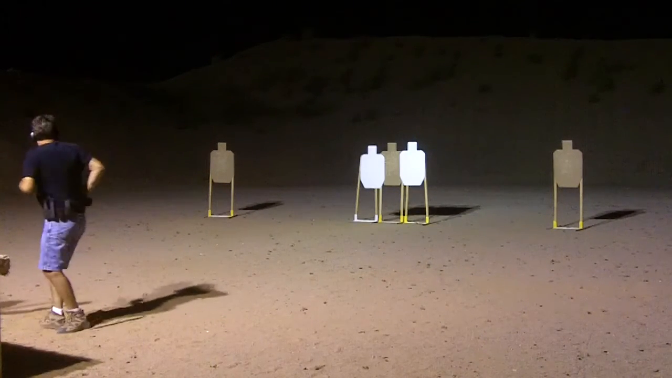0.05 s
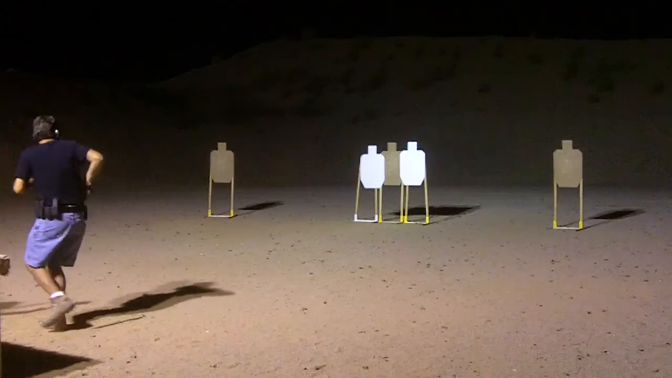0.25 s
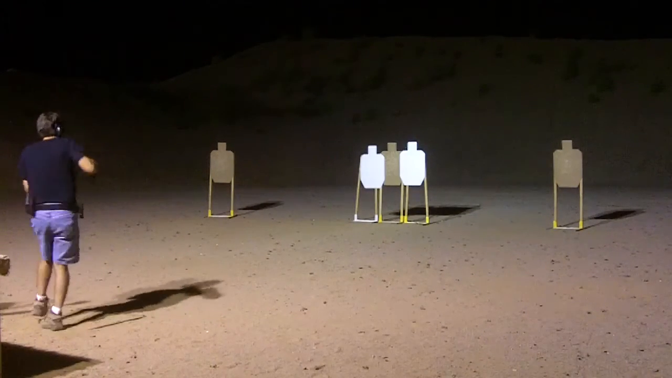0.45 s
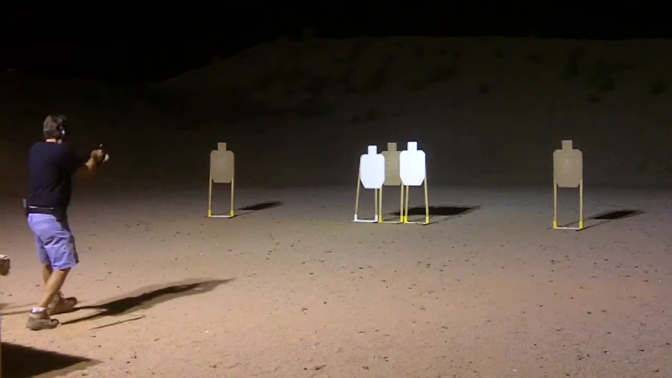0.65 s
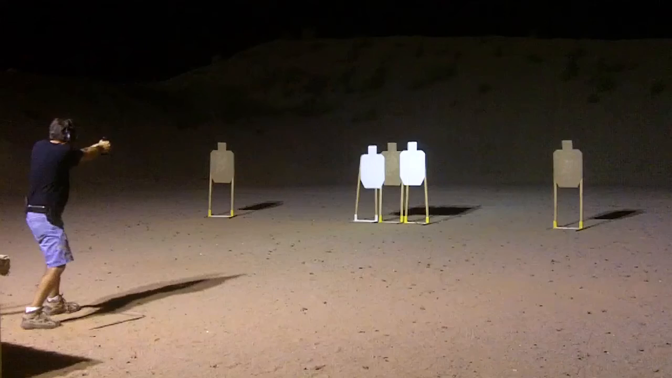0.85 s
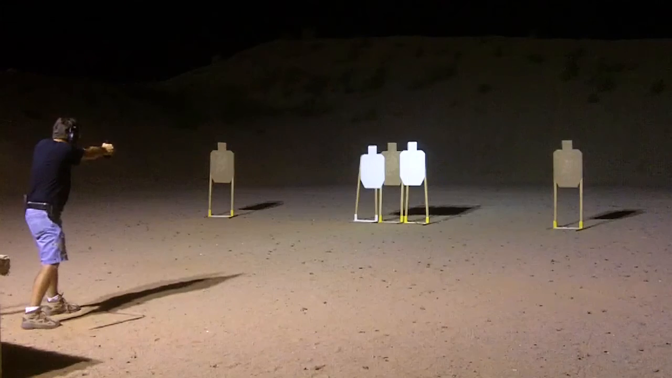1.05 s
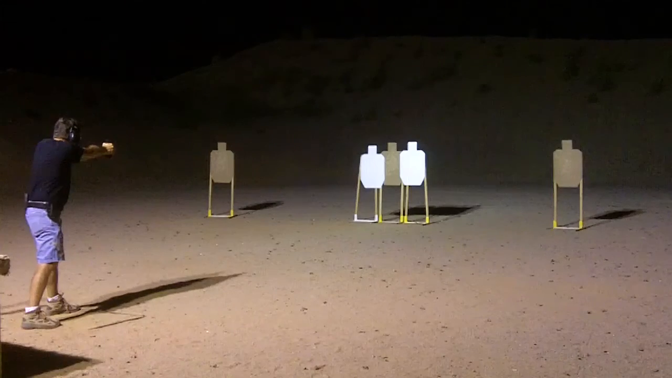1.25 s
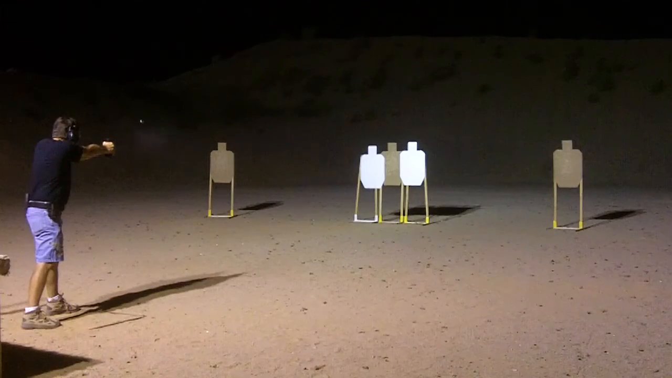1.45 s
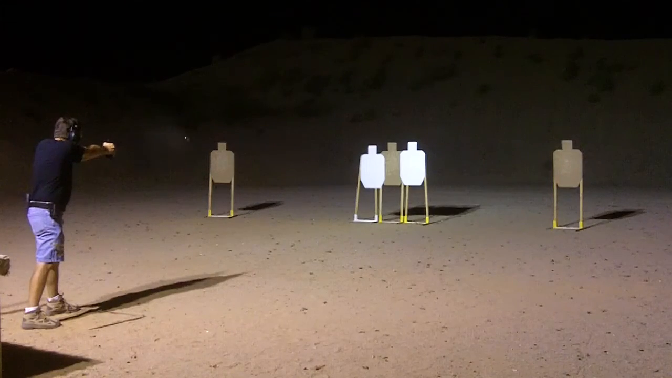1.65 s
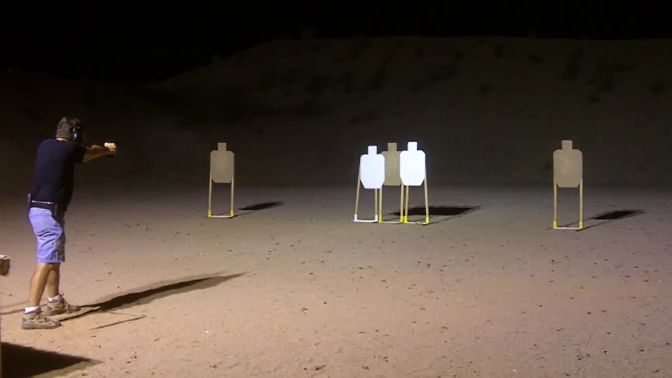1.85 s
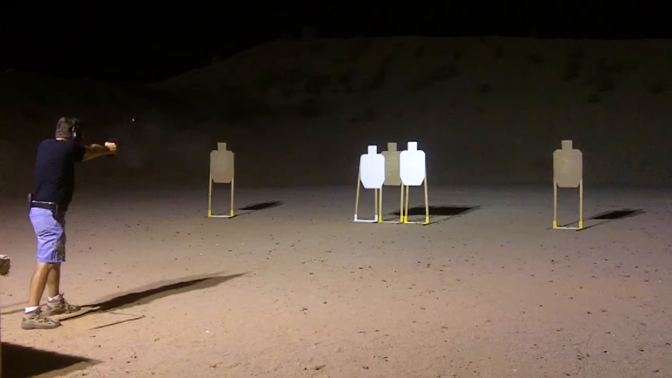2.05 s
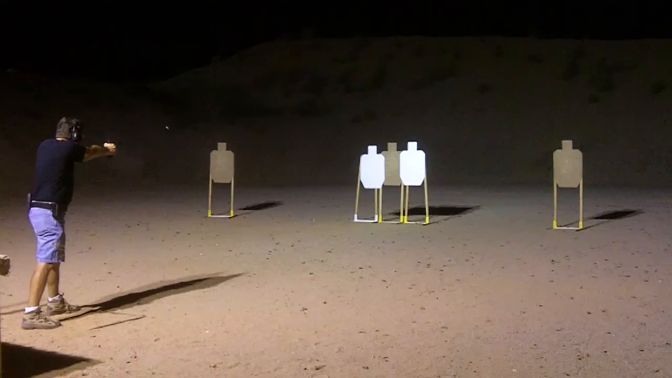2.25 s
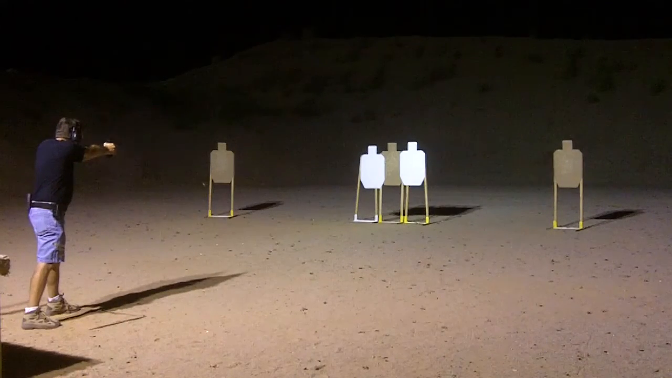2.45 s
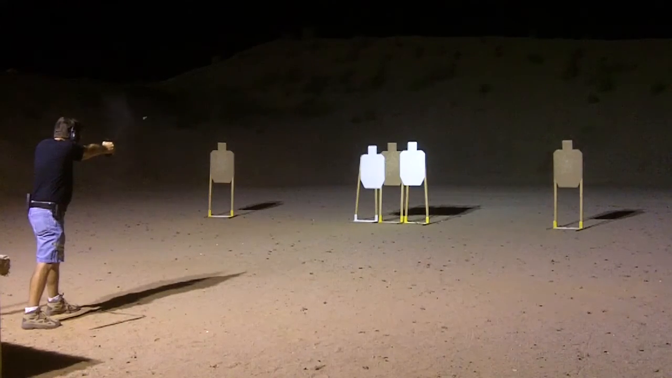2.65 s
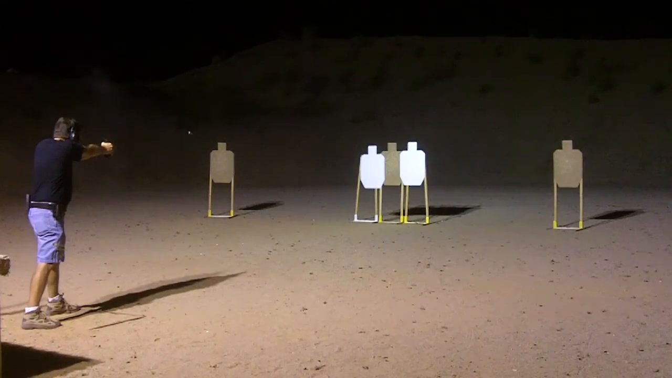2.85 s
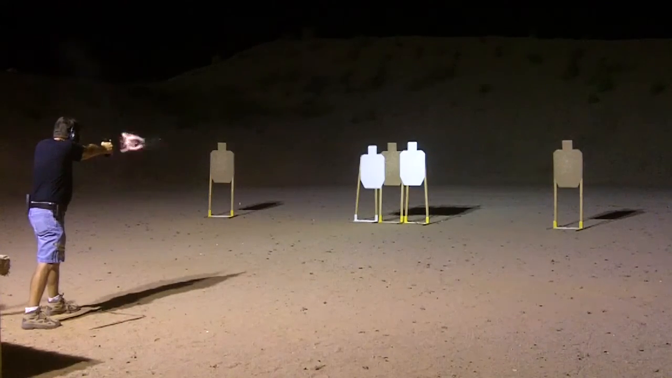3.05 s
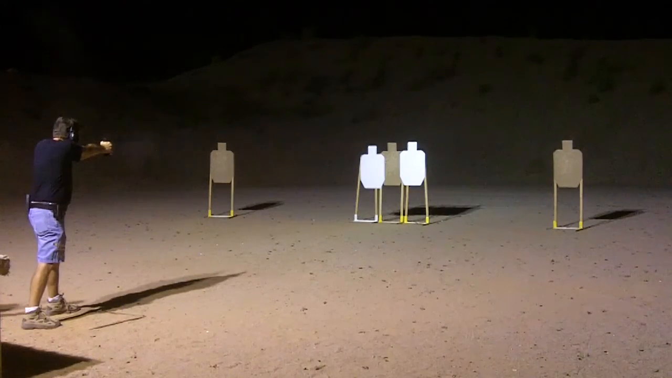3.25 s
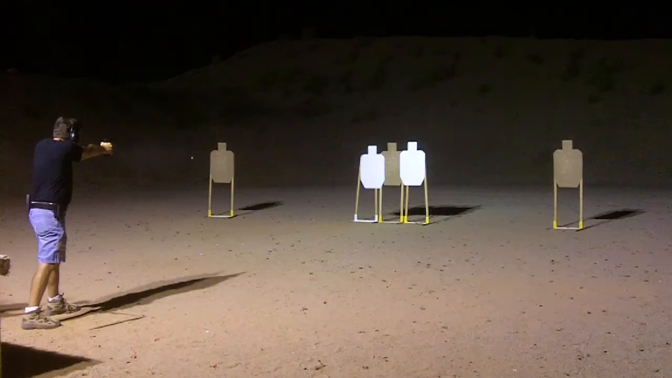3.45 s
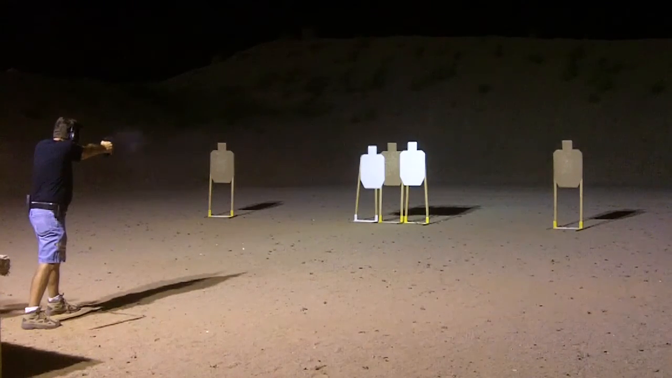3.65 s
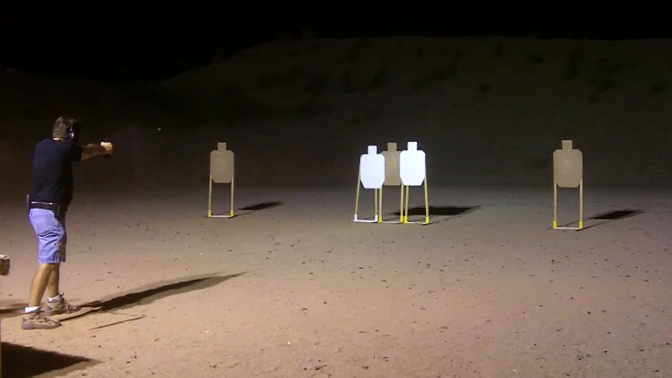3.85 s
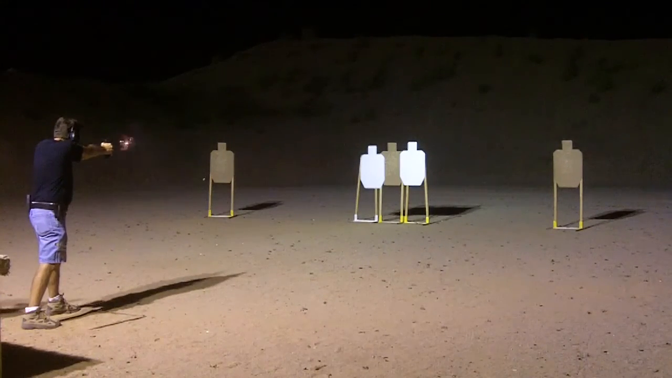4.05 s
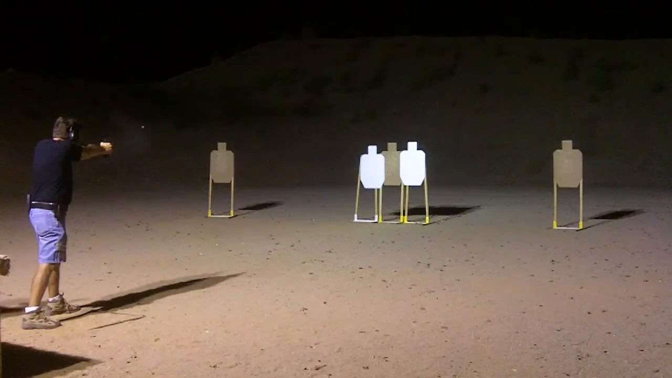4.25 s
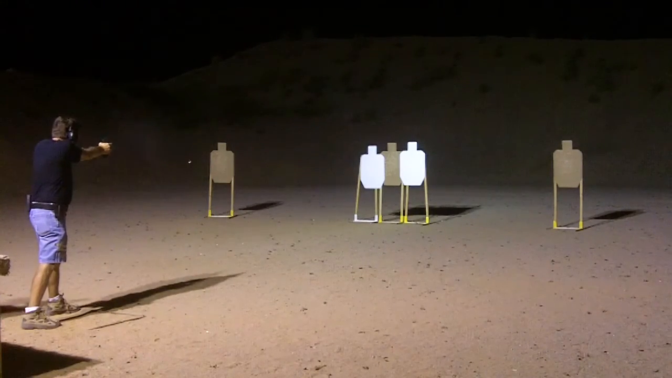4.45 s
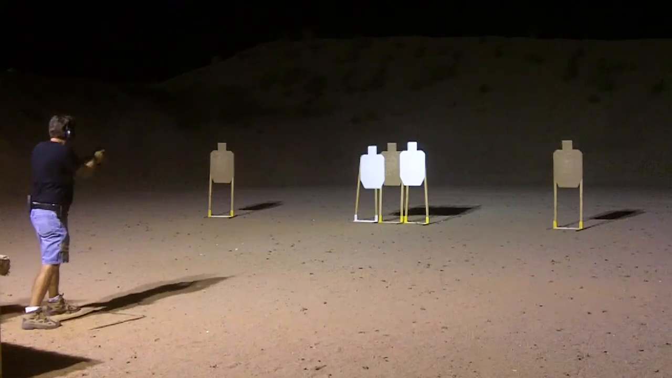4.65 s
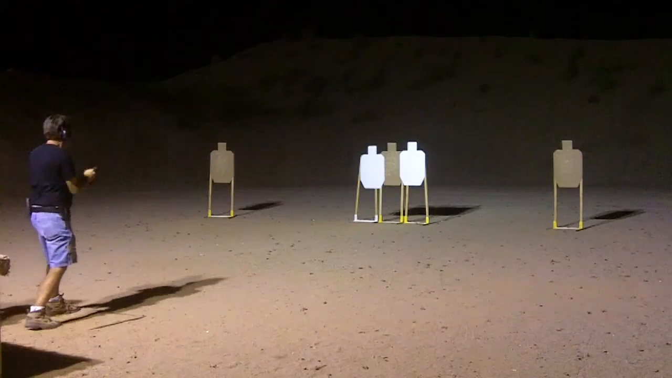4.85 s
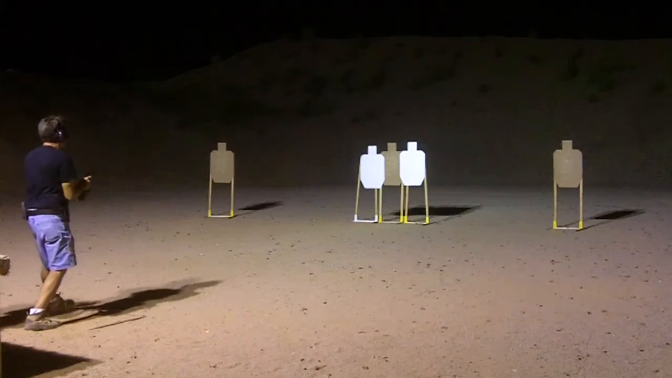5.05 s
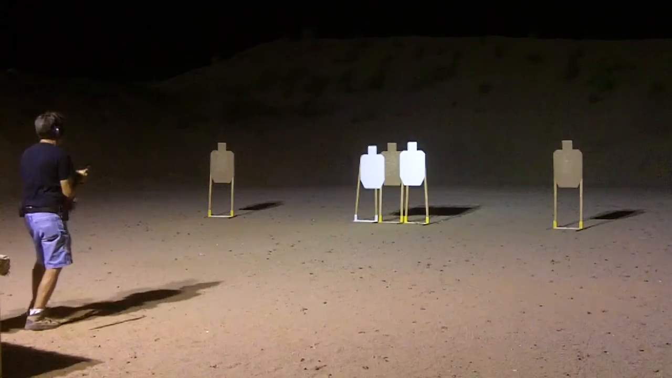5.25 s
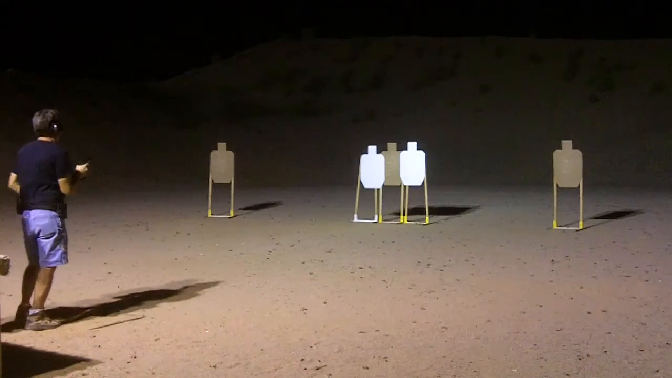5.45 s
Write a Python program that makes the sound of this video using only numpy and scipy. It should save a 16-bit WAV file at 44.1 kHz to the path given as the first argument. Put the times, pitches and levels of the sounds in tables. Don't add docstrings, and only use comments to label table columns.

```python
import sys
import numpy as np
from scipy import signal
from scipy.fft import rfft, irfft, next_fast_len
from scipy.io import wavfile
from scipy.ndimage import uniform_filter1d, map_coordinates

SR = 44100
rng = np.random.default_rng(int(sys.argv[2]) if len(sys.argv) > 2 else 0)


def digitize_waveform(pressure):
    field = np.atleast_2d(pressure).T
    bounded = np.clip(field, -1, 1)
    quanta = np.round(bounded * 32767).astype(np.int16)
    wavfile.write(sys.argv[1], SR, quanta)


def volts(x):
    e = np.asarray(x, float) / 20
    return 10 ** e


N = 242991

# (time [s], blast level [dB], offset left by the blast [full scale],
#         shelter echo level [dB], offset left by that echo [full scale])
SHOTS = [
    (1.3897, 0.5, .07, -3.5, .05),
    (2.0197, -2.5, .22, -4.5, 0.39),
    (2.5763, -2.5, 0.16, -5, -.05),
    (3.1582, -1.5, .21, -3, 0.11),
    (3.6931, -1.5, 0.23, -5, -0.17),
    (4.1653, -2, 0.14, -3.5, .2),
]
SHELTER_S = .0421
# (frequency [Hz], level [dB per Hz])
SLAP = [(260, -33), (450, -5.5), (2120, -0.5), (4630, -17.5), (5630, -26.5), (6840, -22), (8440, -33),
        (14500, -25.5), (15400, -32), (16400, -49)]
# (time [s], peak pressure, + push or - pull [full scale], frequency [Hz])
LUMPS = [(0.046, 0.36, 37), (0.101, 0.29, 61), (0.14, 0.23, 32), (0.181, -0.16, 37.3), (.35, 0.26, 36),
         (.388, 0.0067, 44), (0.403, 0.2, 35), (0.467, 0.33, 29.5), (.494, -.15, 47.4), (0.555, -0.18, 51),
         (0.598, -0.38, 61.6), (0.742, -0.46, 69), (.791, 0.084, 34), (.86, 0.35, 36.6),
         (0.876, -0.075, 37), (0.932, -0.05, 34), (0.985, 0.17, 54.5), (1.292, -0.12, 39.5),
         (1.315, 0.38, 42), (1.376, -0.18, 28.1), (1.923, -.09, 39.5), (4.754, -0.068, 36.1),
         (4.899, 0.058, 32.07), (5.006, -0.06, 46), (5.043, -0.22, 30), (5.125, 0.089, 35.4),
         (5.186, -0.029, 47.3), (5.221, .24, 45), (5.307, 0.054, 48.3), (5.39, -0.074, 46.6)]
# (time [s], peak pressure [full scale], frequency [Hz])
PUFFS = [(1.569, -0.067, 44), (1.67, 0.021, 60.5), (1.857, -0.042, 59.5), (2.011, -.06, 45),
         (2.229, 0.047, 60.3), (2.332, -0.011, 41.2), (2.448, 0.033, 55), (2.515, -0.038, 34.5),
         (2.899, 0.0091, 40), (3.992, 0.019, 71.4), (4.078, -0.016, 45), (4.468, -0.05, 65.5),
         (4.51, 0.026, 56), (4.617, -0.032, 45), (4.679, -0.052, 30)]


def unit(x):
    return x / np.sqrt(np.mean(x ** 2) + 1e-20)


def along(points, hz):
    f, v = np.transpose(points)
    return np.interp(np.log(hz + 1), np.log(f + 1), v)


def wobble(rate):
    knots = rng.standard_normal(int(N * rate / SR) + 4)
    return map_coordinates(knots, [np.arange(N) * rate / SR])


def coloured(x, spectrum):
    m = next_fast_len(len(x) + 8192)
    gain = volts(along(spectrum, np.fft.rfftfreq(m, 1 / SR)))
    return unit(irfft(rfft(x, m) * gain, m)[:len(x)])


def noise(spectrum):
    return coloured(rng.standard_normal(N), spectrum)


def add(track, s, x):
    part = track[round(s * SR):][:len(x)]
    part += x[:len(part)]


def swells(times, db, width):
    distance = (np.arange(N) / SR - times[:, None]) / width
    return np.sum(volts(db)[:, None] * np.exp(-distance ** 2), axis=0)


def wavelet(hz, cycles, phase):
    half = 2 * cycles / hz
    t = np.arange(-half, half, 1 / SR)
    return half, np.exp(-4 * (t * hz / cycles) ** 2) * np.cos(2 * np.pi * hz * t + phase)


def night_air():
    # (frequency [Hz], level [dB per Hz])
    night = [(120, -31.5), (200, -2.5), (579, -4), (723, -8), (815, -14), (1410, -15), (5360, -36),
             (6820, -44.5), (12000, -60.5), (15600, -89), (22000, -120)]
    return volts(-60.0 + 0.5 * wobble(6)) * noise(night)


def scuffs():
    # (start [s], length [s], level [dB])
    steps = [
        (0.024, .08, -72),
        (0.322, 0.058, -63.5),
        (0.541, 0.16, -68),
        (0.684, .08, -65.5),
        (.8, 0.073, -63.5),
        (1.213, 0.092, -70.5),
        (4.837, 0.19, -70.5),
        (5.028, 0.079, -63),
        (5.481, 0.051, -58.5),
    ]
    # (frequency [Hz], level [dB per Hz])
    grit = [(400, -20.5), (900, -1), (1500, 0), (2800, -5), (4500, -15.5), (6500, -19), (9000, -35.5),
            (15000, -51), (17000, -66)]
    rise, fall = 450, 440
    start, length, scuff_db = np.transpose(steps)[:, :, None]
    since = np.arange(N) / SR - start
    fade_db = np.minimum(0, np.minimum(rise * since, fall * (length - since)))
    level_db = np.max(scuff_db + fade_db, axis=0)
    grains = rng.standard_normal(N) * volts(4.5 * wobble(300) + 1.2 * wobble(35))
    shuffle = volts(-80)
    return (volts(level_db) + shuffle) * coloured(grains, grit)


def knocks():
    # (time [s], peak level [dB], frequency [Hz])
    raps = [(0.3162, -47.5, 1747), (0.3388, -43, 1710), (0.3496, -56, 1300), (0.3661, -50, 1260),
            (0.3696, -52, 1620), (0.3916, -41.5, 1750), (0.7309, -59, 1460), (0.7694, -57, 1536),
            (0.8105, -47, 1370), (0.8313, -56, 1400), (1.2355, -44, 1290), (1.2677, -45, 1330),
            (4.701, -49, 1960), (4.905, -63, 3830), (5.076, -50, 4250), (5.111, -55.5, 2660),
              (5.232, -62, 4100), (.338, -45, 2780), (.367, -43, 2750), (1.216, -57.5, 4400),
              (1.228, -54, 1470), (1.247, -50, 1480), (1.257, -50, 1370), (1.281, -41, 1440),
              (1.958, -62.5, 3700), (1.998, -45, 1490)]
    out = np.zeros(N)
    t = np.arange(SR // 30) / SR
    for s, db, hz in raps:
        low = np.sin(2 * np.pi * hz * t * (1 - 1.5 * t))
        high = .45 * np.sin(2 * np.pi * 1.6 * hz * t)
        add(out, s, volts(db - 2.5 - 60 * t / .016) * (low + high))
    return out


def buffeting(strength_db, surges):
    # (frequency [Hz], level [dB per Hz])
    buffet = [(3, -22), (12, 8), (40, -7), (65, -11), (110, -37.5), (200, -96.5)]
    uneven = volts(0.53 * wobble(38) + 1.8 * wobble(27))
    return (volts(strength_db + 7.5) + surges) * unit(uneven * noise(buffet))


def flutter(strength_db, surges):
    # (frequency [Hz], level [dB per Hz])
    flutter_colour = [(30, -42), (60, -2.5), (120, -6), (220, -19.5), (450, -49), (900, -78.5),
                      (2000, -110)]
    calm_db, growth, under_db = -31, 1.1, -14.5
    lump_s, peak, _ = np.transpose(LUMPS + PUFFS)
    steady = volts(calm_db + growth * (strength_db - calm_db) + under_db)
    stir = swells(lump_s, 20 * np.log10(np.abs(peak) + 1e-3) - 14, width=.02)
    uneven = volts(2.2 * wobble(30))
    return (steady + stir + .3 * surges) * unit(uneven * noise(flutter_colour))


def lumps():
    out = np.zeros(N)
    for s, size, hz in LUMPS + PUFFS:
        half, wave = wavelet(hz, 0.54, rng.normal(0, 0.59))
        add(out, s - half, size * wave)
    return out


def fizz(pressure):
    # (frequency [Hz], level [dB per Hz])
    tearing = [(1500, -20), (4000, -3.5), (9000, -3.5), (15500, -5.5), (17000, -40.5)]
    return volts(-62.5 + 6 * wobble(350) + 3 * wobble(18)) * pressure ** 2 * noise(tearing)


def thumps():
    # (time [s], peak level [dB], frequency [Hz])
    eddies = [(0.046, -39, 255), (0.095, -34, 236), (0.17, -40.5, 250), (0.28, -47, 216), (0.479, -42, 255),
              (0.512, -27.5, 245), (.531, -28, 393), (.588, -46, 255), (0.617, -33, 352),
              (.674, -47.5, 330), (0.736, -30.5, 237), (.787, -35, 245), (.8, -38.5, 301),
              (0.845, -37, 255), (0.859, -37, 258), (0.887, -43, 254), (.9, -41.5, 285), (1.29, -24.5, 233),
              (1.296, -43, 299), (1.307, -34.5, 246), (1.846, -44, 239), (3.993, -50.5, 245),
              (4.457, -50, 243), (4.613, -60, 240), (5.11, -40, 253), (5.202, -45, 240), (5.228, -23, 252),
              (5.244, -36, 255), (5.271, -35.5, 255), (5.338, -28.5, 258.6)]
    out = np.zeros(N)
    for s, db, hz in eddies:
        half, wave = wavelet(hz, 0.84, rng.uniform(0, 2 * np.pi))
        add(out, s + 0.00411 - half, volts(db + 13.0) * wave)
    return out


def ticks():
    # (time [s], peak level [dB])
    kinks = [(.0427, -40), (0.139, -46), (0.184, -43.5), (0.306, -50.5), (.402, -45), (0.4097, -48),
             (0.4633, -42.5), (0.4719, -43), (0.4775, -40.5), (.4844, -52), (0.5561, -42.5), (.7257, -44),
             (.847, -46.5), (0.8624, -46), (0.9263, -47.5), (0.9338, -51.5), (1.2945, -46), (1.3181, -43),
             (5.0411, -39.5), (5.0501, -40.5), (5.0624, -40), (5.069, -43.5), (5.077, -43), (5.1446, -48.5),
             (5.1662, -46.5), (5.221, -48), (5.234, -44.5), (5.3311, -48), (5.452, -51.5), (5.4751, -49)]
    out = np.zeros(N)
    t = np.arange(SR // 50) / SR
    rounding = .00009
    step = 1 - (1 + t / rounding) * np.exp(-t / rounding)
    kink = step * np.exp(-t / .003)
    for s, db in kinks:
        add(out, s, volts(db + 17.0) * rng.choice([-1, 1]) * kink)
    return out


def wind():
    # (time [s], level [dB])
    gusts = [(0, -17), (.11, -32), (.58, -26.5), (.95, -28), (1.23, -33), (1.56, -43.5), (1.95, -41.5),
             (2.24, -44), (2.46, -42), (2.92, -48), (3.07, -44.5), (3.27, -53), (4.04, -44.5),
             (4.45, -43.5), (4.79, -33.5), (4.96, -29), (5.11, -26), (5.51, -28.5)]
    strength_db = np.interp(np.arange(N) / SR, *np.transpose(gusts))
    surges = swells(np.array(SHOTS)[:, 0] + SHELTER_S, np.full(len(SHOTS), -22.5), width=.04)
    pressure = buffeting(strength_db, surges) + flutter(strength_db, surges) + lumps()
    return pressure + fizz(pressure) + thumps() + ticks()


def whines():
    # (start [s], first pitch [Hz], slowing time [s], peak level [dB], swell time [s])
    fragments = [
        (4.5, 1990, 1.08, -61, .2),
        (4.64, 1530, .68, -62.5, .09),
    ]
    out = np.zeros(N)
    for start, first_hz, slowing, db, swell in fragments:
        since = np.clip(np.arange(N) / SR - start, 0, None)
        hz = first_hz / np.sqrt(1 + since / slowing) * (1 + .004 * wobble(65))
        turns = 2 * np.pi * np.cumsum(hz) / SR
        fade = 2 * since / swell / (1 + (since / swell) ** 2.6)
        size = fade * volts(db + 2.4 * wobble(22))
        out += size * (np.sin(turns) + .06 * np.sin(2 * turns))
    return out


def banks():
    # (delay [s], level [dB], brightness above 2.5 kHz [dB per octave])
    scatter = [
        (0, -2, 4),
        (.009, -0.5, 0.5),
        (0.03, -6.5, -1),
        (0.041, 2.3, -3.5),
        (.076, -1.04, 0),
        (.088, -3, 0),
        (.21, -1.6, 3),
        (.235, -4.5, 1),
        (0.991, 11, 1),
    ]
    # (frequency [Hz], time to fall 60 dB [s])
    fading = [(100, 0.36), (500, 0.63), (1500, 0.64), (3000, 0.59), (6000, 0.44), (10000, 0.36),
              (16000, 0.31)]
    # (frequency [Hz], level [dB per Hz])
    tail = [(71, -43.5), (120, 1.5), (153, -4.5), (204, 0.5), (427, -5), (949, -5), (1050, -3), (2340, -9),
            (2480, -7), (3110, -17), (4680, -19.5), (5410, -28.5), (6500, -25), (13300, -50.5),
            (16000, -81)]
    delay, db, bright_db = np.transpose(scatter)
    hz, t, z = signal.stft(coloured(rng.standard_normal(SR), tail), SR, nperseg=256)
    octaves = np.log2(np.clip(hz / 2500, 1, None))[:, None]
    patches = uniform_filter1d(rng.standard_normal(z.shape), size=12, axis=0)
    patches = unit(uniform_filter1d(patches, size=3, axis=1))
    decay_db = -60 * t / along(fading, hz)[:, None]
    z = z * volts(decay_db + octaves * np.interp(t, delay, bright_db) + 2.0 * patches)
    level_db = np.interp(np.arange(SR) / SR, delay, db) + 1.5 * wobble(220)[:SR]
    return signal.istft(z, SR, nperseg=256)[1][:SR] * volts(level_db)


def burst(spectrum, rise, length, fall):
    t = np.arange(SR // 50) / SR
    shape = np.clip(t / rise, 0, 1) * np.exp(-np.clip(t - length, 0, None) / fall)
    return shape * coloured(rng.standard_normal(SR // 10), spectrum)[:len(t)]


def settling(size):
    t = np.arange(SR) / SR
    swing = 1.5 * np.exp(-t / .032) - .45 * np.exp(-t / .11)
    return size * (1 - np.exp(-t / .0008)) * swing


def blast(out, s, db, offset):
    # (frequency [Hz], level [dB per Hz])
    body = [(260, -29), (450, 2.5), (1370, -1.5), (3530, -8), (4040, -5.5), (5380, -19.5), (6540, -17),
            (9520, -30.5), (10400, -23), (14300, -25), (16400, -32.5)]
    # (frequency [Hz], level [dB per Hz])
    crack_colour = [(5000, -35.5), (8000, -6), (11000, -6.5), (14500, -1.5), (16400, -20)]
    add(out, s, volts(db - 6.0) * burst(body, rise=0.0015, length=0.0035, fall=0.00069))
    crack = burst(crack_colour, rise=.0001, length=.0002, fall=.00015)
    add(out, s + rng.uniform(.001, 0.0035), volts(db - 15) * crack)
    add(out, s + .0025, settling(offset))


def shelter(out, s, db, offset):
    add(out, s + SHELTER_S, volts(db - 2.5) * burst(SLAP, rise=.0006, length=.0018, fall=.0004))
    add(out, s + SHELTER_S + .0015, settling(offset))


def backstop(out, s):
    # (delay [s], level [dB], frequency [Hz], length [cycles])
    delay, db, hz, cycles = (.0813, -8, 1800, 1.2)
    half, wave = wavelet(hz, cycles, np.pi / 2)
    add(out, s + delay - half + rng.normal(0, .0002), volts(db) * wave)
    add(out, s + delay, volts(-31.5) * burst(SLAP, rise=.0002, length=.0006, fall=.0003))


def dull_echoes(out, s):
    # (delay [s], level [dB], frequency [Hz], length [cycles])
    ground = (.0104, -5, 660, 1.9)
    # (delay [s], level [dB], frequency [Hz], length [cycles])
    later = [
        (.0500, -14, 1790, 3.5),
        (.190, -29, 1326, 5),
        (.205, -36, 560, 3.2),
        (.279, -35.5, 630, 2.5),
        (.291, -34, 737, 2.9),
        (.285, -46, 494, 2.7),
    ]
    for delay, db, hz, cycles in [ground] + later:
        half, wave = wavelet(hz * (1 + .02 * rng.normal()), cycles, np.pi + .25 * rng.normal())
        add(out, s + delay - half, volts(db + 0.16 * rng.normal()) * wave)


def shots():
    out = np.zeros(N)
    for s, blast_db, offset, slap_db, slap_offset in SHOTS:
        blast(out, s, blast_db, offset)
        shelter(out, s, slap_db, slap_offset)
        add(out, s, volts(-17) * banks())
        backstop(out, s)
        dull_echoes(out, s)
    return out


def ducking():
    since = np.arange(N) / SR - np.array(SHOTS)[:, :1] + 0.0077
    drop_db = np.where(since > 0, -8 * np.exp(-np.abs(since) / .09), 0)
    return uniform_filter1d(volts(np.sum(drop_db, axis=0)), size=300)


def scene():
    background = wind() + scuffs() + knocks() + night_air()
    mono = ducking() * background + whines() + shots()
    loudness = np.abs(uniform_filter1d(np.abs(mono), size=2000))
    rumble = noise([(20, 8), (150, -21.5), (400, -31), (1200, -48), (16000, -56.5)])
    trace = volts(-32.5) * loudness * rumble
    return np.array([mono + trace, mono - trace])


def band_limit(x):
    return signal.sosfilt(signal.butter(12, 16510, fs=SR, output="sos"), x)


def record(dry):
    # (centre [Hz], width [Hz], depth [0-1])
    centre, width, depth = (5450, 450, .9)
    band = signal.lfilter(*signal.iirpeak(centre, centre / width, fs=SR), dry)
    x = dry - np.clip(depth, 0, 1) * band + .008
    x = x / (1 + np.abs(x / 1.05) ** 12) ** (1 / 12)
    x = signal.sosfilt(signal.butter(16, 16300, fs=SR, output="sos"), x)
    return band_limit(np.clip(x, -1.1, 1.1))


dry = scene()
out = record(dry)
digitize_waveform(out)
```